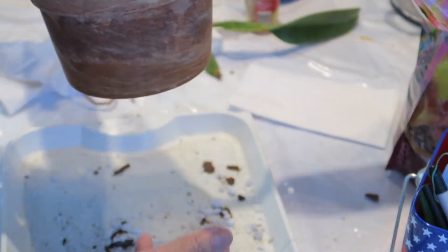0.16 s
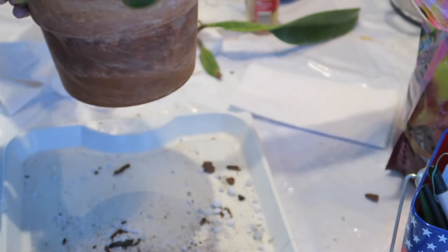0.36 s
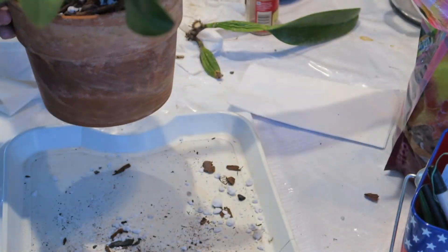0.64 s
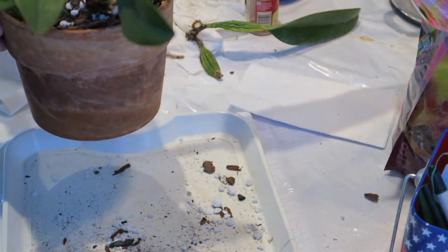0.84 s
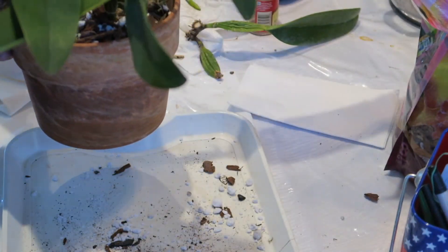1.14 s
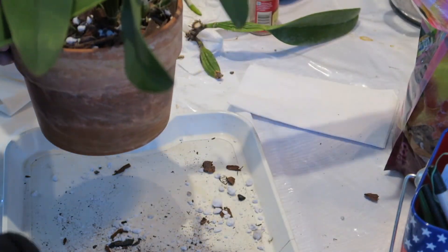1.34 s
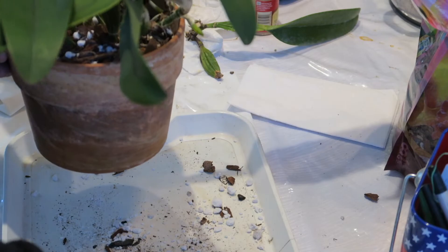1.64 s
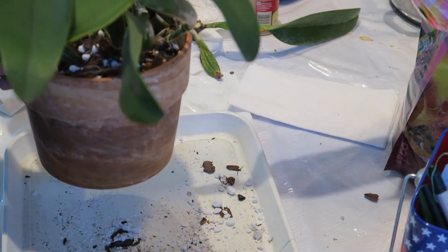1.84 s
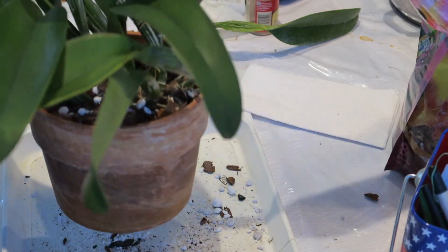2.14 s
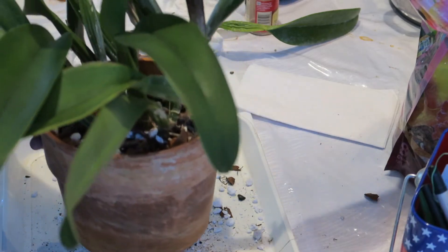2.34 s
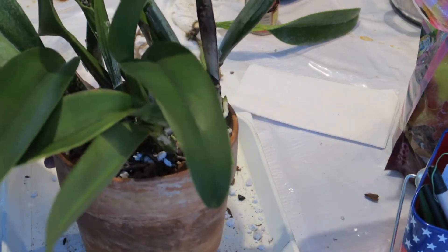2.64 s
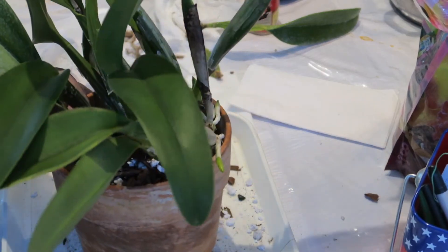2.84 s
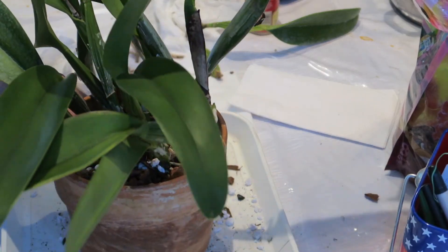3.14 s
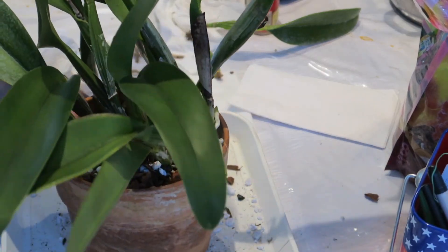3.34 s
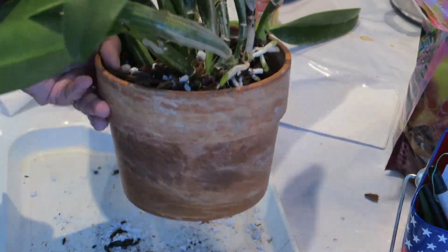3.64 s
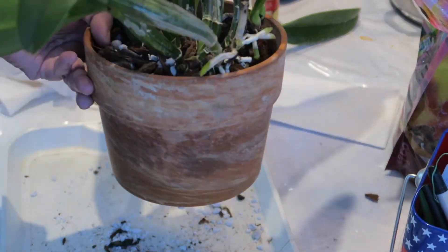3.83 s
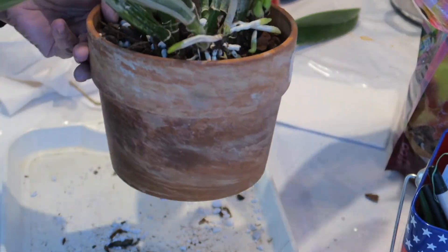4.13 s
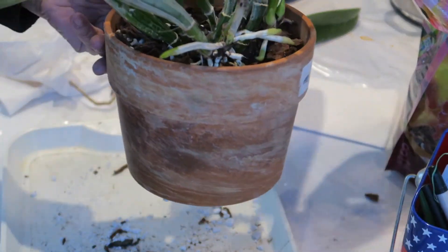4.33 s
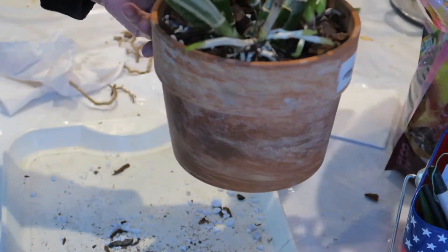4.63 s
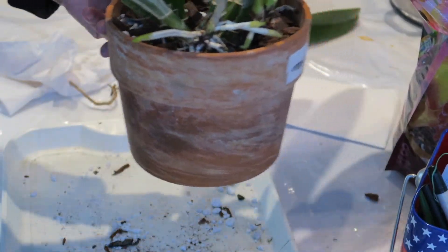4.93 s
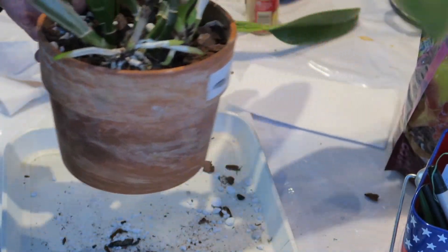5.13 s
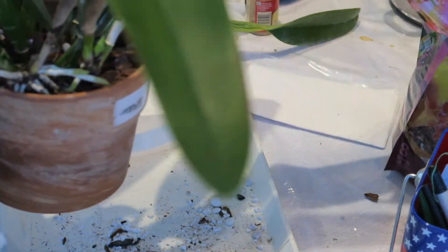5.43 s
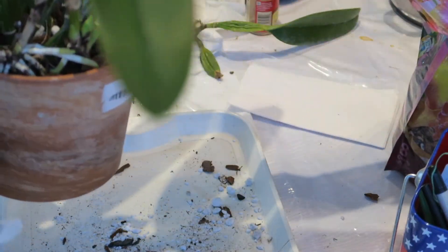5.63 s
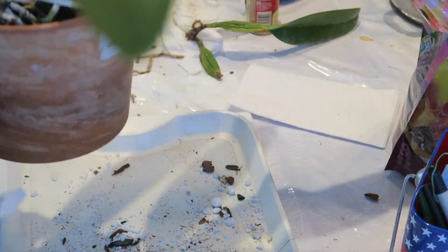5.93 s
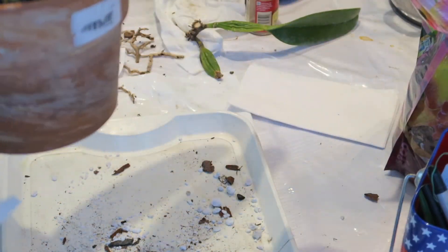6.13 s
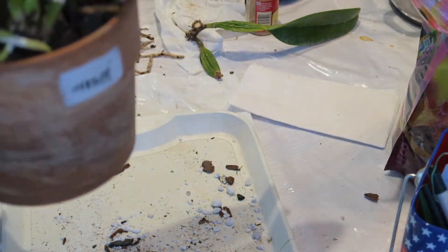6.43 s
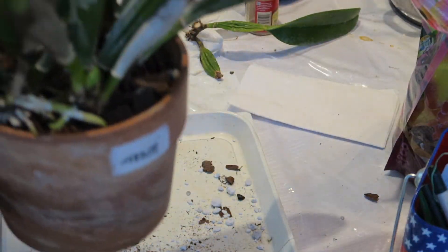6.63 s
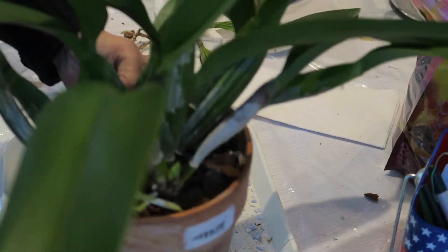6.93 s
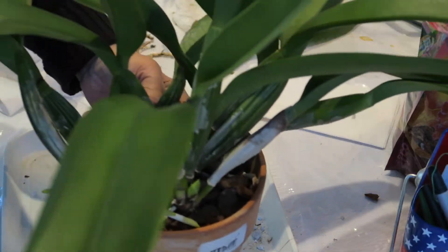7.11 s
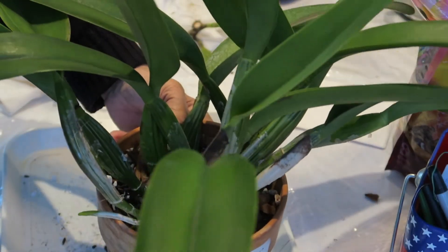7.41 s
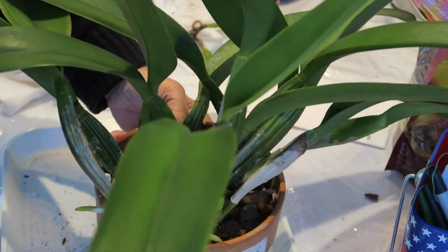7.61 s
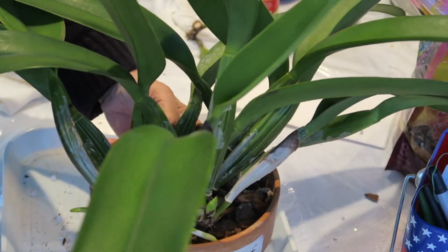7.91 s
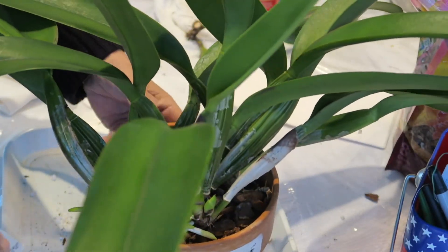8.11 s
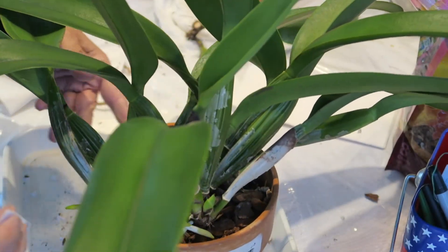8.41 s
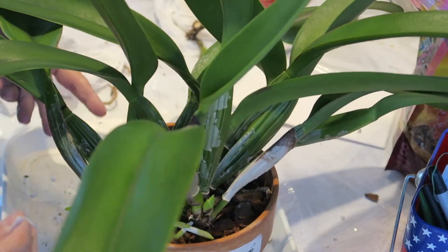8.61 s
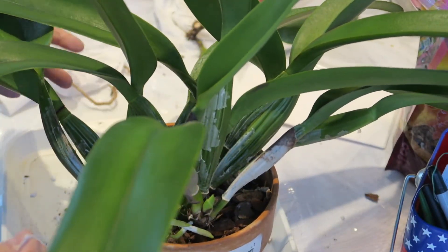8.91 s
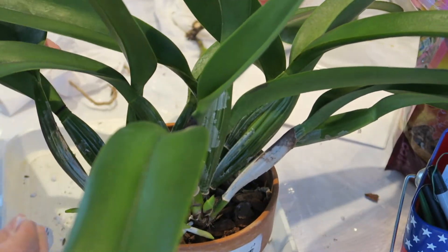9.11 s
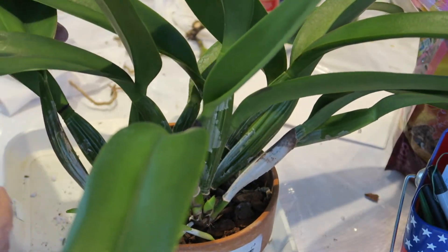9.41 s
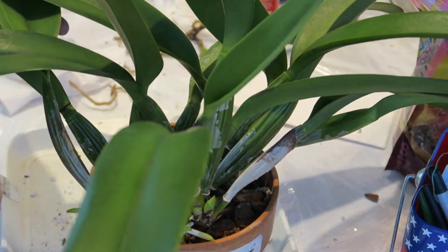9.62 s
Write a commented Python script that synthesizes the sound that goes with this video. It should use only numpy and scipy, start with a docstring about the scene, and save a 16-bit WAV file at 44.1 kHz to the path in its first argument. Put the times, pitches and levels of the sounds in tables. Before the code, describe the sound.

A potted plant is turned on a plastic tray, leaves bumping softly, grit scraping, then loud hard knocks as the clay pot lands amid steady hum.

```python
"""Potted orchid turned on a tray

A clay pot is set down on a plastic tray and turned by hand in a small room. Grit snaps and scrapes under it,
stiff leaves brush, clack and bump. Mains hum, a fan and a whirring motor run throughout.
Impacts are damped modes, short jolts and noise bursts; rubbing is clumped random slips; the fan is shaped noise,
hum and motor are sines. The handled objects pass through early echoes and a noise-built room tail.
"""
import sys
import numpy as np
from scipy import signal
from scipy.fft import rfft, irfft, next_fast_len
from scipy.io import wavfile
from scipy.ndimage import uniform_filter1d, map_coordinates

SR = 44100
rng = np.random.default_rng(int(sys.argv[2]) if len(sys.argv) > 2 else 0)


def bounce(signal):
    """Save signal as a 16-bit WAV file at the path given by the first command-line argument."""
    frames = np.transpose(np.atleast_2d(signal))
    limited = np.clip(frames, -1, 1)
    pcm = np.round(limited * 32767).astype(np.int16)
    wavfile.write(sys.argv[1], SR, pcm)


N = 430416  # samples

# Grit snaps under the pot, and one strong echo at 8.065 s. Each row: start in seconds, jolt peak in dB,
# jolt pitch in Hz, build-up scale in cycles, tray thud relative to the jolt in dB, pitch the thud favours in Hz.
GRIT_SNAPS = [(3.064, -26, 1600, 0.22, -3.5, 870), (3.073, -25, 2030, .6, -22, 800),
              (3.08, -23, 2540, 0.43, -22, 800), (3.156, -26, 1980, 0.52, -10, 1050),
              (3.227, -23.5, 2310, 0.41, -19, 750), (3.23, -26, 1400, 0.29, -13, 600),
              (3.291, -33, 2200, 0.8, -23, 750), (3.313, -23.5, 2300, 0.85, -25, 750),
              (3.363, -37, 2080, 0.37, -14, 750), (3.397, -21, 1900, 0.2, -10, 1100),
              (7.502, -18, 1870, 0.39, -7.5, 800), (7.594, -27, 2050, 0.44, -16, 800),
              (7.651, -27, 1530, 0.9, -19, 800), (7.705, -25, 1800, 0.54, -7, 800),
              (7.742, -22.5, 1890, 0.35, -14, 800), (7.767, -22, 2300, 0.4, -16, 800),
              (7.784, -29, 2420, 0.58, -20, 800), (7.801, -6.5, 1710, 0.27, -9, 654),
              (7.812, -25, 1510, 0.27, 5.5, 480), (8.053, -2.5, 2030, 0.3, -15.5, 900),
              (8.065, -13, 1900, 0.28, -13, 900), (8.278, -23.5, 2700, 0.29, -33, 610),
              (8.365, -27, 2300, 0.44, -29, 610), (8.375, -17, 2340, 0.45, -28, 610),
              (8.409, -26, 2120, 0.43, -16, 610), (8.467, -25.5, 2820, 0.24, -28, 610),
              (9.555, -34, 1780, .9, -24, 610)]
# Tray floor modes. Each row: pitch in Hz, relative level in dB, t60 in seconds.
TRAY_FLOOR_MODES = [(310, -14, .05), (448, -10, 0.03), (544, -16, 0.026), (748, 3, 0.031),
                    (1035, 4.5, 0.012), (1420, -15, 0.015)]
# Soil-filled clay pot modes. Each row: pitch in Hz, relative level in dB, t60 in seconds.
CLAY_MODES = [(2020, -4, 0.074), (2390, -10, 0.033), (2650, 5, .04), (3250, 21, 0.056), (3820, -21, 0.06),
              (4870, -11, .05)]
# Contact noise of breaking grit. Each row: frequency in Hz, relative spectral level in dB.
BREAKING_GRIT_COLOUR = [(200, 2), (800, 0.5), (2400, -4), (3300, -6), (4500, -9.5), (8000, -18.5),
                        (10000, -23.5), (12500, -17.5), (15500, -31)]


def snaps():
    """Grit snaps, and one strong echo: a quick jolt, a tray thud, a brief clay ring and a noise burst."""
    track = np.zeros(N)
    for start_s, peak_db, jolt_hz, cycles, thud_db, thud_hz in GRIT_SNAPS:
        jolt = swing(jolt_hz, cycles)
        thud = amp(thud_db) * ring(TRAY_FLOOR_MODES, slope_db=-1.0, favour_hz=thud_hz, detune=0.016)
        clay = amp(-28) * ring(CLAY_MODES, slope_db=-4, favour_hz=2400, detune=0.011)
        burst = amp(-12.5) * crack(BREAKING_GRIT_COLOUR, slope_db=3.0, t60=0.03)
        add(track, start_s, amp(peak_db) * (jolt + thud + clay + burst))
    return track


# Base dragged over the tray. Each row: start in seconds, length in seconds, level in dB,
# share of the length spent building up, contact resonance in Hz.
BASE_SCRAPES = [(2.52, 0.14, -59, 0.12, 1700), (3.057, 0.024, -29.5, 0.52, 2240),
                (3.094, 0.03, -43.5, .4, 2820), (3.133, 0.066, -32.5, 0.42, 2500),
                (3.213, 0.065, -44, .15, 2200), (3.266, 0.093, -47, 0.31, 2230),
                (3.351, 0.031, -40, 0.47, 2100), (5.23, 0.046, -53.5, .25, 2500),
                (7.012, .023, -45, .17, 1700), (7.44, 0.055, -29, 0.34, 1910),
                (7.512, 0.074, -47.5, 0.15, 1700), (7.582, 0.05, -34.5, 0.54, 2030),
                (7.638, 0.056, -37, 0.17, 1600), (7.697, 0.049, -38.5, .2, 1870),
                (7.739, 0.047, -37, 0.31, 1900), (8.043, .0032, -38, .17, 2300),
                (8.356, 0.072, -39, .17, 2180), (9.15, 0.2, -61.5, 0.33, 2300),
                (9.539, 0.014, -42, 0.5, 1770)]
# Grit friction colour. Each row: frequency in Hz, relative spectral level in dB.
GRIT_COLOUR = [(50, -29), (200, -10), (450, -20.5), (830, -2), (1250, -9), (2100, -3.5), (2600, -11),
               (3050, -10), (5000, -11), (7000, -15), (10000, -20.5), (12500, -16.5), (15500, -35)]
CONTACT_WIDTH_HZ, CONTACT_DB = 450, -3  # resonance relative to the plain grit noise


def scrapes():
    """The base slips over grit; each stroke bears on another spot and rings at its own pitch."""
    track = np.zeros(N)
    grit = friction(GRIT_COLOUR, slope_db=-1.0, catches_per_s=1200, spread_db=1.0, hiss=0.4,
                    judder_db=0.8, patchy_db=3.0, judder_rate=100)
    for start_s, length_s, level_db, rise, contact_hz in BASE_SCRAPES:
        contact = lambda f: 1 + amp(CONTACT_DB) * resonance(f, contact_hz, CONTACT_WIDTH_HZ)
        begin = round(start_s * SR)
        slips = unit(filtered(grit[begin:begin + SR // 2], contact))
        gain = stroke(length_s, level_db, rise, sag=0.85, release_t60=0.08)
        add(track, start_s, slips * gain[:len(slips)])
    return track


# Dragged clay wall resonances. Each row: pitch in Hz, width in Hz, gain in dB.
WALL_RESONANCES = [(870, 58, -9), (1770, 44, -17), (2040, 22, -8), (2483, 85, 3.5), (2950, 33, -22),
                   (3620, 150, -2), (4600, 56, -12)]


def through_pot(x):
    """Grit under the base keeps the clay wall singing: resonances add to the scrape."""
    wall = lambda f: 1 + sum(amp(db) * resonance(f, hz, width) for hz, width, db in WALL_RESONANCES)
    return filtered(x, wall)


# Tray floor groans under the pot's full weight. Each row: start in seconds, length in seconds, level in dB.
TRAY_GROANS = [(7.02, 0.037, -34), (7.05, 0.27, -53), (7.445, 0.043, -36.5), (7.6, 0.2, -43.5),
               (7.803, 0.03, -30.5)]
# Hollow groan colour. Each row: frequency in Hz, relative spectral level in dB.
HOLLOW_COLOUR = [(220, -26.5), (330, -12.5), (400, -2.5), (480, -11.5), (580, -29), (700, -9), (1000, -34),
                 (1550, -18), (2200, -26), (6000, -33), (15000, -47)]


def groans():
    """The loaded tray floor groans: uneven friction with a hollow colour."""
    gain = strokes_gain(TRAY_GROANS, rise=0.13, sag=0.17, release_t60=1.0)
    return gain * friction(HOLLOW_COLOUR, slope_db=-0.5, catches_per_s=390, spread_db=4.5, hiss=0.78,
                           judder_db=2.0, patchy_db=1.5)


# Louder bumps of pot and leaves. Each row: start in seconds, level in dB, brightness in dB per octave,
# crunch length in seconds.
BUMPS = [(1.528, -34, -4, 0.0032), (1.915, -31, -6, 0.0056), (2.316, -27, -0.5, 0.022),
         (2.489, -19, -3.5, 0.0051), (2.511, -16.5, 1, 0.0081), (2.524, -26, -3, .007),
         (2.535, -22.5, 0.5, 0.0093), (2.552, -16, -2, 0.007), (2.576, -26, 0, 0.0052),
         (2.596, -27, -3.5, .004), (2.627, -24.5, -2.5, 0.0028), (3.479, -23, 0, 0.0042),
         (3.596, -21, -2, 0.0034), (3.604, -20, 3, 0), (4.128, -27.5, -5, .003), (4.133, -23.5, -2.5, .005),
         (4.152, -30.5, -6, 0.0092), (4.194, -26.5, -1.5, 0.0049), (4.396, -26, 1, 0.0034),
         (4.419, -26.5, -3.5, 0.0056), (4.442, -28, -4, 0.0062), (4.532, -28, -1, 0.01),
         (4.549, -25.5, -2, 0.0026), (4.573, -24.5, -2, 0.012), (4.586, -29, -3, 0.003),
         (4.607, -31, -3, 0.0045), (4.627, -29, 2, 0.0042), (4.717, -23, -3, .004),
         (4.773, -24, -5, 0.000022), (4.778, -17.5, -1, 0.0021), (4.784, -23.5, -6.5, .008),
         (4.806, -30, -3, 0.0032), (4.860, -23, 1, 0.003), (4.863, -23.5, -6, 0.0011),
         (4.957, -28.5, -7, 0.0076), (5.123, -32, 0, 0.0021), (5.138, -29.5, -4, 0.0051),
         (5.168, -19, 4, 0.0046), (5.176, -27.5, -6, 0.0083), (5.224, -27.5, -2.5, .002),
         (5.711, -31, 0, 0.0081), (6.057, -30.5, -2, 0.00012), (6.099, -30, -6, .003),
         (6.115, -25, -5, .003), (7.020, -27, -0.5, 0.0042), (7.25, -33, -1, 0.0031),
         (9.245, -36.5, 2, 0.0067)]
# Heavily damped bump modes. Each row: pitch in Hz, relative level in dB.
BUMP_MODES = [(105, -13), (205, -5), (310, -5.5), (470, -3), (680, 3), (930, 2), (1320, 2), (1950, 3.5),
              (2500, -0.5), (3500, 3.5), (4400, -2)]
# Contact noise of soft bumps and clacks. Each row: frequency in Hz, relative spectral level in dB.
SOFT_CONTACT_COLOUR = [(100, -40), (600, 13), (2000, 3), (4500, -0.5), (7500, -13), (10000, -43),
                       (15000, -48)]
# Low thumps under the heavier bumps. Each row: start in seconds, peak in dB.
LOW_THUMPS = [(2.513, -27), (2.545, -33), (3.612, -34), (4.132, -27), (4.78, -41), (4.86, -33),
              (5.172, -33), (7.455, -45), (7.811, -30.5)]
# Low thump modes. Each row: pitch in Hz, relative level in dB, t60 in seconds.
THUMP_MODES = [(97, 3, .22), (132.4, 2, 0.27), (196, 0.5, 0.1), (265, -6.5, 0.25), (326, -2, 0.058)]


def knocks():
    """Soft bumps of pot and leaves, some crunching; thumps add a longer, deeper ring."""
    track = np.zeros(N)
    decay_cycles = 13  # to -60 dB, for every bump mode
    modes = [(hz, db, decay_cycles / hz) for hz, db in BUMP_MODES]
    for start_s, level_db, slope_db, length_s in BUMPS:
        # 0.06 octave lower per dB of brightness
        favour_hz = min(1190 * 2 ** (-0.06 * slope_db), 1700)
        body = ring(modes, slope_db, favour_hz, detune=0.063)
        blow = body + amp(-9.5) * crack(SOFT_CONTACT_COLOUR, slope_db, t60=0.024)
        add(track, start_s, amp(level_db) * crunch(blow, length_s, count=4))
    for start_s, peak_db in LOW_THUMPS:
        thump = ring(THUMP_MODES, slope_db=5.5, favour_hz=190, detune=0.0097)
        add(track, start_s, amp(peak_db) * thump)
    return track


# Stiff leaves and stems flicking together. Each row: start in seconds, jolt peak in dB, jolt pitch in Hz.
LEAF_CLACKS = [(2.554, -21, 1500), (4.396, -30, 2300), (4.574, -29, 2100), (4.588, -28, 1900),
               (4.628, -28.5, 2000), (4.777, -19, 2200), (4.858, -12, 2080), (5.225, -23, 2200),
               (6.099, -26, 2800)]


def clacks():
    """A stiff leaf springs free and strikes its neighbour: a dry, sharp crack with no ring."""
    track = np.zeros(N)
    for start_s, peak_db, jolt_hz in LEAF_CLACKS:
        burst = amp(-9.5) * crack(SOFT_CONTACT_COLOUR, slope_db=3, t60=0.015)
        add(track, start_s, amp(peak_db) * (swing(jolt_hz, cycles=0.17) + burst))
    return track


# Leaves and hands rubbing along. Each row: start in seconds, length in seconds, level in dB.
LEAF_RUBS = [(2.311, 0.016, -38), (2.482, 0.027, -31.5), (2.508, 0.048, -29), (2.572, 0.14, -44.5),
             (3.476, 0.22, -43), (4.124, 0.032, -31), (4.392, 0.098, -38), (4.516, 0.19, -41.5),
             (4.717, 0.14, -43), (5.125, 0.064, -42), (5.165, 0.078, -38.5), (5.222, 0.092, -44),
             (6.02, 0.047, -39.5), (6.05, 0.09, -38.5), (7.19, 0.35, -48), (7.446, 0.056, -35.5)]
# Leaf friction colour. Each row: frequency in Hz, relative spectral level in dB.
LEAF_COLOUR = [(41, 3.5), (70, 1), (212, 5.5), (560, -1.5), (701, -2), (1150, -5.5), (1810, -7),
               (2720, -10.5), (3260, -14.5), (10300, -44.5), (11600, -40), (13200, -51), (15500, -82)]


def rubs():
    """Leaves and hands rub: sparse slips over hiss, quick to build."""
    gain = strokes_gain(LEAF_RUBS, rise=0.1, sag=0.45, release_t60=0.088)
    return gain * friction(LEAF_COLOUR, slope_db=0.86, catches_per_s=340, spread_db=3.0, hiss=0.4,
                           judder_db=1.0, patchy_db=3.0)


# Sleeve and leaves sliding lightly. Each row: start in seconds, length in seconds, level in dB.
LIGHT_SWISHES = [(1.175, 0.083, -46.5), (1.375, 0.038, -53.5), (1.48, 0.037, -59.5), (1.58, 0.055, -54),
                 (1.76, 0.013, -50.5), (2.2, 0.35, -65.5), (3.568, 0.021, -51), (3.66, 0.95, -61),
                 (4.4, 1.22, -63.5), (5.88, 0.061, -54), (6.02, 0.066, -48.5), (6.05, 0.057, -47.5),
                 (6.6, 1.1, -68), (8.89, 0.066, -61.5)]
# Cloth friction and tick colour. Each row: frequency in Hz, relative spectral level in dB.
CLOTH_COLOUR = [(900, 7.5), (1600, 11), (1800, 8), (2000, 3), (2600, 7.5), (3400, 4), (4900, 2.5),
                (7000, -8.5), (10000, -13.5), (13500, -15), (15500, -55)]


def swishes():
    """Sleeve and leaves slide lightly: bright, patchy friction."""
    gain = strokes_gain(LIGHT_SWISHES, rise=0.3, sag=0.97, release_t60=0.17)
    return gain * friction(CLOTH_COLOUR, slope_db=7.5, catches_per_s=1400, spread_db=4.0, hiss=0.6,
                           judder_db=2.5, patchy_db=6.5)


# A leaf squeaking on its neighbour. Each row: start in seconds, length in seconds, level in dB.
LEAF_SQUEAKS = [(1.19, 0.08, -53)]
# Waxy friction colour. Each row: frequency in Hz, relative spectral level in dB.
WAXY_COLOUR = [(1200, -52), (1690, -24), (1800, 8), (1900, -22), (2300, -34), (2500, -12), (2700, -32),
               (5000, -45)]


def squeaks():
    """A leaf squeaks: dense slips in a narrow band, slow to build."""
    gain = strokes_gain(LEAF_SQUEAKS, rise=0.84, sag=0.6, release_t60=0.056)
    return gain * friction(WAXY_COLOUR, slope_db=-2, catches_per_s=1700, spread_db=4, hiss=0.45,
                           judder_db=1.5, patchy_db=0.5)


# Small ticks of stems and bark. Each row: start in seconds, peak in dB.
STEM_TICKS = [(0.771, -44), (0.951, -46), (1.41, -46), (1.62, -45), (1.781, -46), (2.704, -29.5),
              (3.577, -30), (3.604, -24.5), (5.345, -34.5), (5.908, -30), (8.953, -40), (9.157, -41)]
STRAY_DB, STRAY_SPREAD_DB = -44, 3  # fainter ticks at chance moments


def ticks(stray_count):
    """Dry stems and crumbs of bark tick as the plant shifts, each with its own brightness."""
    track = np.zeros(N)
    stray_times_s = rng.random(stray_count) * N / SR
    strays = zip(stray_times_s, rng.normal(STRAY_DB, STRAY_SPREAD_DB, stray_count))
    for start_s, peak_db in list(STEM_TICKS) + list(strays):
        tick = crack(CLOTH_COLOUR, slope_db=rng.normal(0, 2.2), t60=0.026)
        add(track, start_s, amp(peak_db) * tick / np.abs(tick).max())
    return track


# Fan rush. Each row: frequency in Hz, relative spectral level in dB.
AIR_COLOUR = [(12, -31), (20, -8), (80, -10), (112, -6.5), (207, -9), (289, -4), (333, -13), (372, -8.5),
              (465, -14.5), (746, -22), (1100, -20), (1410, -20), (1870, -21.5), (10500, -39.5),
              (15500, -48)]
# Fan housing resonances. Each row: pitch in Hz, width in Hz, gain in dB.
HOUSING_RESONANCES = [(295, 33, -6), (619, 29, 8.5), (770, 81, 9.5), (2250, 300, -26)]


def fan():
    """Rushing air: nearly steady diffuse noise, coloured by the housing."""
    housing = lambda f: np.sqrt(1 + sum(amp(db) ** 2 / (1 + (2 * (f - hz) / width) ** 2)
                                        for hz, width, db in HOUSING_RESONANCES))
    air = filtered(rng.standard_normal((2, N)), lambda f: amp(along(AIR_COLOUR, f)) * housing(f))
    unsteady = amp(0.35 * wobble(3))
    return amp(-47.0) * unsteady * unit(diffuse(air))


# Hum lines. Each row: pitch in Hz, level in dB.
HUM_LINES = [(37, -69), (60, -65), (102, -60.5), (120, -55), (248, -66.5), (290, -54.5), (579, -74),
             (743, -71)]


def hum():
    """Mains hum: sines of constant level on a slightly drifting clock."""
    return tones(HUM_LINES, drift=0.002, waver_db=0.0)


# Motor whirr lines. Each row: multiple of shaft speed, level in dB.
WHIRR_LINES = [(57, -79), (61, -95), (63, -67.5), (64, -66.5), (67, -65.5), (68, -63.5), (71, -72),
               (72, -74), (73, -76), (111, -74.5)]
SHAFT_HZ = 20.6


def motor():
    """Motor whirr: shaft harmonics that drift together and waver separately in level."""
    lines = [(multiple * SHAFT_HZ, db) for multiple, db in WHIRR_LINES]
    return tones(lines, drift=0.00107, waver_db=3.0)


def tones(lines, drift, waver_db):
    """Sines on one slightly unsteady speed, each with a phase offset between channels set by its pitch."""
    clock_s = np.cumsum(1 + drift * wobble(2)) / SR
    out = np.zeros((2, N))
    for hz, db in lines:
        apart = likeness_angle(hz) * np.array([[1], [-1]])
        phase = 2 * np.pi * (hz * clock_s + rng.random())
        level = amp(db + waver_db * np.clip(wobble(7.4), -1.5, 1.5))
        out += np.sqrt(2) * level * np.sin(phase + apart)
    return out


# Early wall echoes. Each row: delay in seconds, level in dB.
WALL_ECHOES = [(0.0118, -16), (0.0192, -25)]


def in_room(x, pan_db, wet_db, lead_s=0.000095, widest_rad=1.93):
    """A source a little to the right: direct sound, near walls and the room's tail."""
    x = filtered(x, lambda hz: (1j * hz / (80 + 1j * hz)) ** 2)  # bass below about 80 Hz falls away
    phase = lambda hz: np.minimum(2 * np.pi * hz * lead_s, widest_rad)  # right channel leads
    direct = filtered(x, lambda hz: np.exp(0.5j * phase(hz) * np.array([[-1], [1]])))
    direct = direct * amp([[pan_db / 2], [-pan_db / 2]])
    echoes = sum(amp(db) * np.pad(direct, ((0, 0), (round(delay_s * SR), 0)))[:, :N]
                 for delay_s, db in WALL_ECHOES)
    return direct + echoes + amp(wet_db) * room_tail(x)


# Room decay. Each row: frequency in Hz, t60 in seconds.
ROOM_T60 = [(150, 0.76), (530, 0.75), (1400, 0.63), (2400, 0.48), (3700, 0.45), (10000, 0.41)]


def room_tail(x):
    """Decaying-noise reverberation, drawn afresh for every half second of sound."""
    step = SR // 2
    pieces = np.pad(x, (0, -N % step)).reshape(-1, step)
    hz, t, z = signal.stft(rng.standard_normal((len(pieces), 2, step)), SR, nperseg=256)
    clutter = 1 + np.exp(-(t / 0.029) ** 2)  # clutter round the table answers first
    build_up = (1 - np.exp(-t / 0.0071)) * clutter
    decay = amp(-60 * t / along(ROOM_T60, hz)[:, None])
    tails = diffuse(signal.istft(z * build_up * decay, SR, nperseg=256)[1])
    answers = signal.fftconvolve(pieces[None], tails / np.linalg.norm(tails[0, 0]), axes=2)
    out = np.zeros((2, N))
    for channel, row in zip(out, answers):
        for k, answer in enumerate(row):
            add(channel, k * step / SR, answer)
    return out


# Diffuse sound. Each row: frequency in Hz, left-right likeness before clipping to -1..1.
LIKENESS = [(60, 1), (130, 0.98), (290, 0.77), (640, 0.63), (1400, -0.091), (3100, -0.42), (7000, -0.37),
            (15000, -1.1)]


def likeness_angle(hz):
    """Half the angle whose cosine is the left-right likeness."""
    return np.arccos(np.clip(along(LIKENESS, hz), -1, 1)) / 2


def diffuse(pair):
    """Two unrelated noises blended into stereo: alike in the bass, partly opposed in the treble."""
    blend = lambda hz: np.array([np.cos(likeness_angle(hz)), np.sin(likeness_angle(hz))])
    mid, side = filtered(pair, blend).swapaxes(0, -2)
    return np.array([mid + side, mid - side])


def ring(modes, slope_db, favour_hz, detune):
    """A struck body, peak 1; the spot hit favours some modes, each blow wakes them at new strengths."""
    t = np.arange(SR // 4) / SR
    hz, db, t60 = np.transpose(modes)[:, :, None]
    size, shift, side = rng.standard_normal((3, len(modes), 1))
    spot_db = 5 * np.exp(-(np.log2(hz / favour_hz) / 0.5) ** 2)
    vibration = np.sign(side) * np.sin(2 * np.pi * hz * (1 + detune * shift) * t)
    onset = 1 - np.exp(-hz * t * 2)  # time constant of half a cycle
    decay = amp(db + spot_db + 2 * size - 60 * t / t60)
    sound = np.sum(tilt(hz, slope_db) * decay * vibration * onset, axis=0)
    return sound / np.abs(sound).max()


def crack(colour, slope_db, t60):
    """A contact's noise burst: rms-1 coloured noise under an exponential decay."""
    t = np.arange(SR // 4) / SR
    shade = lambda hz: amp(along(colour, hz)) * tilt(hz, slope_db)
    noise = filtered(rng.standard_normal(len(t)), shade)
    return amp(-60 * t / t60) * unit(noise)


def swing(hz, cycles):
    """One quick jolt, peak 1: its envelope tops out at three times cycles, then dies away."""
    t = np.arange(SR // 4) / SR
    age = t * hz / cycles
    jolt = age ** 3 * np.exp(-age) * np.sin(2 * np.pi * hz * t)
    return jolt / np.abs(jolt).max()


def crunch(sound, length_s, count):
    """A contact giving way in quick extra steps over length_s, with the energy of a single blow."""
    out = sound.copy()
    for when, size in zip(rng.random(count), rng.normal(0, 0.69, count)):
        add(out, when * length_s, size * sound)
    return out * np.linalg.norm(sound) / np.linalg.norm(out)


def friction(colour, slope_db, catches_per_s, spread_db, hiss, judder_db, patchy_db, judder_rate=130):
    """Tiny uneven slips over hiss; level comes in clumps, colour shifts as the contact moves."""
    sizes = rng.choice([-1, 1], N) * amp(spread_db * np.clip(rng.standard_normal(N), -2, 2))
    slips = unit(sizes * (rng.random(N) < catches_per_s / SR)) + hiss * rng.standard_normal(N)
    hz, _, z = signal.stft(slips, SR, nperseg=512)
    patches = uniform_filter1d(rng.standard_normal(z.shape), size=4, axis=0)
    patches = unit(uniform_filter1d(patches, size=9, axis=1))
    shade = amp(along(colour, hz)) * tilt(hz, slope_db)
    z = z * shade[:, None] * amp(patchy_db * np.clip(patches, -2, 2))
    sound = signal.istft(z, SR, nperseg=512)[1][:N]
    return unit(sound) * amp(judder_db * np.clip(wobble(judder_rate), -2, 2))


def stroke(length_s, level_db, rise, sag, release_t60):
    """Gain of one stroke: builds over a share (rise) of its length, sags, then lets go."""
    t = np.arange(2 * SR) / SR
    held = np.interp(t / length_s, [0, np.clip(rise, 0.01, 0.99), 1], [0, 1, sag])
    return held * amp(level_db - 60 * np.maximum(t - length_s, 0) / release_t60)


def strokes_gain(strokes, rise, sag, release_t60):
    """Summed gain of a set of strokes of one shape."""
    track = np.zeros(N)
    for start_s, length_s, level_db in strokes:
        add(track, start_s, stroke(length_s, level_db, rise, sag, release_t60))
    return track


def resonance(f, hz, width_hz):
    """Complex band-pass response of one resonance, 1 at its centre."""
    return 1j * f * width_hz / (hz * hz - f * f + 1j * f * width_hz)


def amp(db):
    """Decibels to gain."""
    return 10 ** (np.asarray(db) / 20)


def unit(x):
    """Scale to rms 1."""
    return x / np.sqrt(np.mean(x ** 2) + 1e-20)


def along(points, hz):
    """(Hz, value) points read on a log axis."""
    f, v = np.transpose(points)
    return np.interp(np.log(hz + 1), np.log(f + 1), v)


def tilt(hz, slope_db):
    """Gain leaning by slope_db per octave about 1 kHz, flat outside 100-8000 Hz."""
    return amp(slope_db * np.log2(np.clip(hz, 100, 8000) / 1000))


def wobble(rate):
    """A smooth random curve, rate knots a second."""
    knots = rng.standard_normal(int(N * rate / SR) + 4)
    return map_coordinates(knots, [np.arange(N) * rate / SR])


def filtered(x, response):
    """x times a complex response of frequency."""
    n = x.shape[-1]
    m = next_fast_len(n + 8192)
    return irfft(rfft(x, m) * response(np.fft.rfftfreq(m, 1 / SR)), m)[..., :n]


def add(track, start_s, sound):
    """Mix a sound into a track at start_s."""
    part = track[round(start_s * SR):][:len(sound)]
    part += sound[:len(part)]


def scene():
    """The pot and its leaves in the humming room."""
    pot = in_room(snaps(), pan_db=-0.5, wet_db=-4.5)
    dragging = in_room(through_pot(scrapes()) + groans(), pan_db=-0.5, wet_db=-7.5)
    plant = in_room(knocks() + clacks() + rubs(), pan_db=-1.5, wet_db=-3.5)
    light = in_room(swishes() + squeaks() + ticks(stray_count=24), pan_db=-1.0, wet_db=0.0)
    machines = (fan() + hum() + motor()) * amp([[0.6], [-0.6]])  # a little to the left
    return pot + dragging + plant + light + machines


def record(dry):
    """Tall peaks round off towards 0.85; treble rolls off near 14.9 kHz and stops at 15.6 kHz."""
    rounded = dry / (1 + (dry / 0.85) ** 6) ** (1 / 6)
    return filtered(rounded, lambda hz: (hz < 15600) / np.sqrt(1 + (hz / 14900) ** 40))


dry = scene()
out = record(dry)
bounce(out)
```